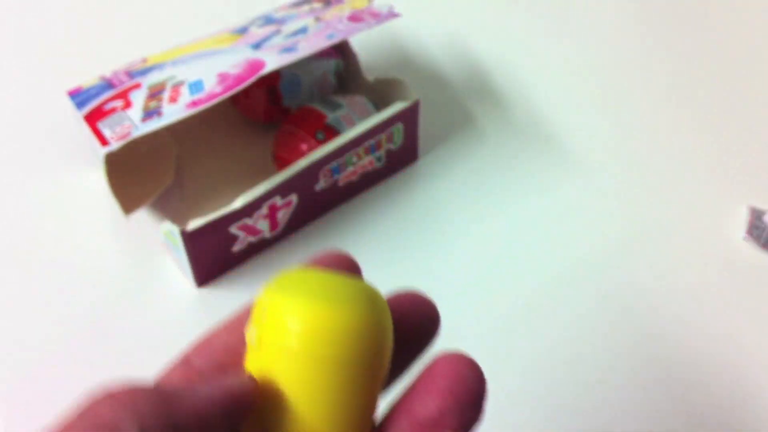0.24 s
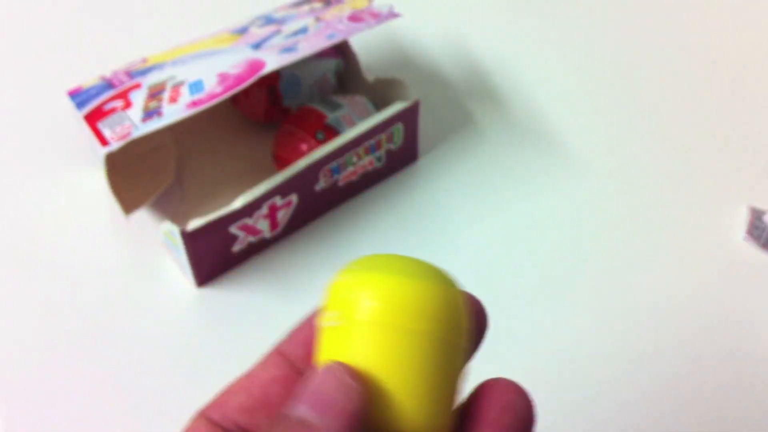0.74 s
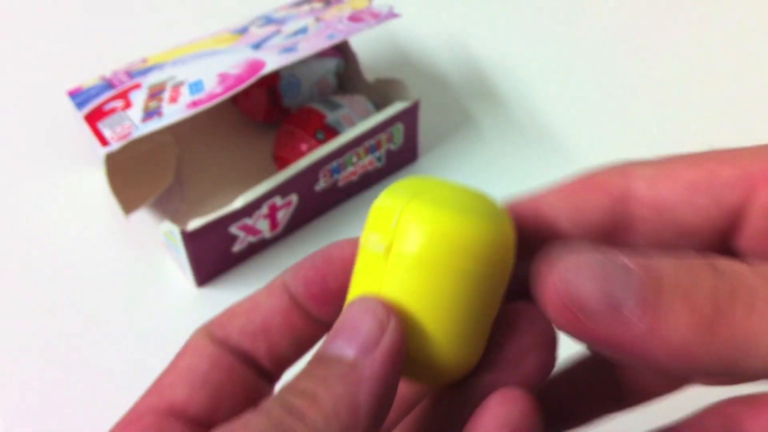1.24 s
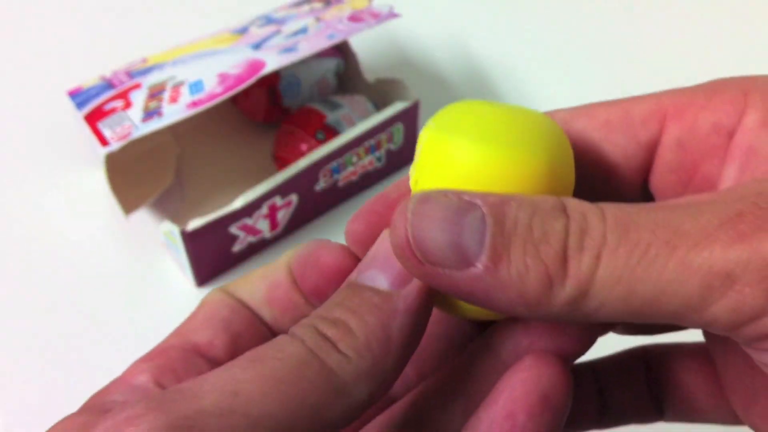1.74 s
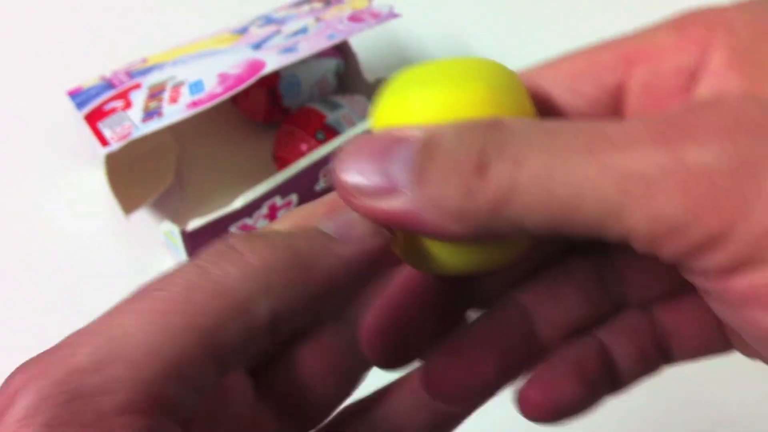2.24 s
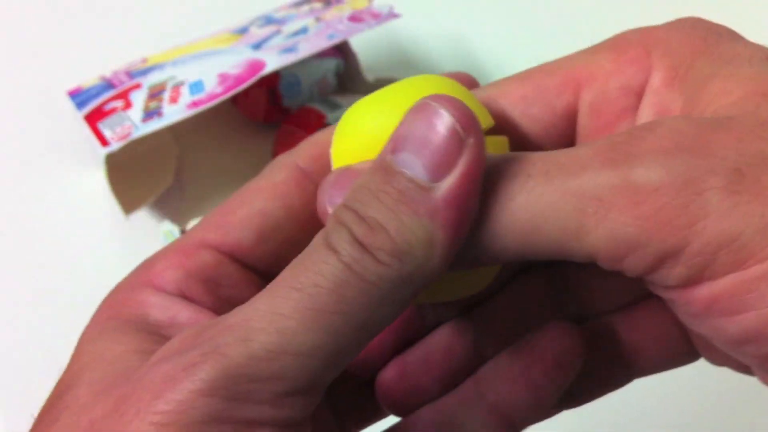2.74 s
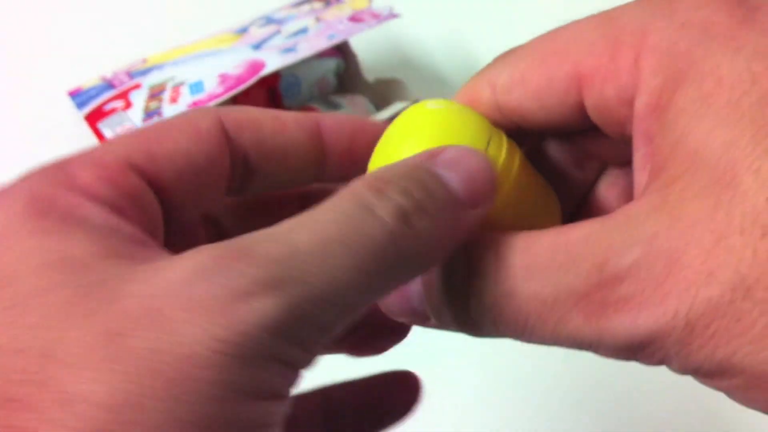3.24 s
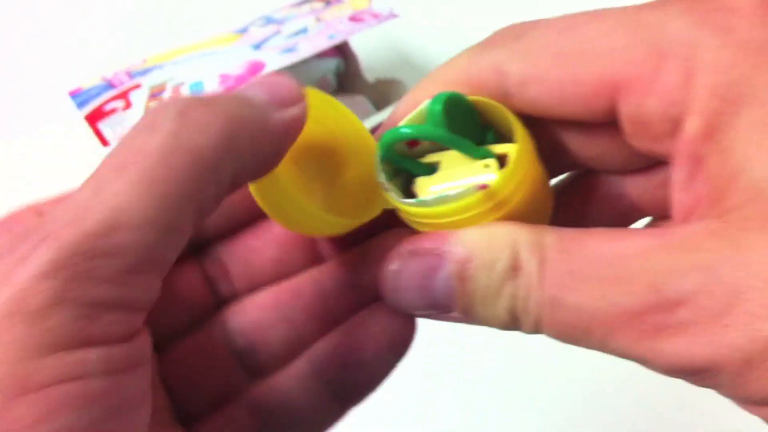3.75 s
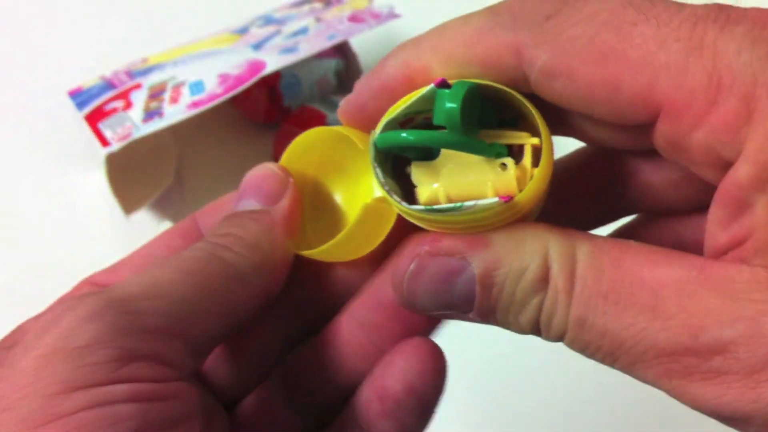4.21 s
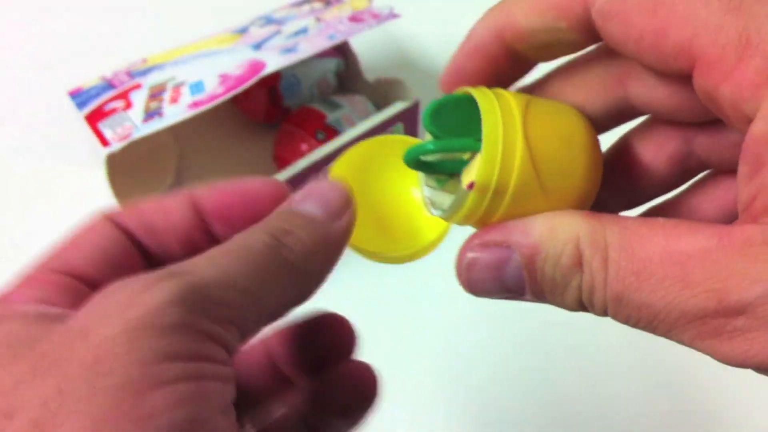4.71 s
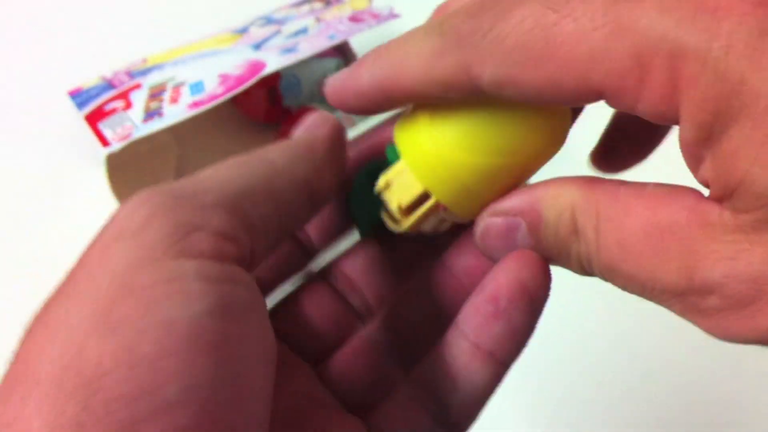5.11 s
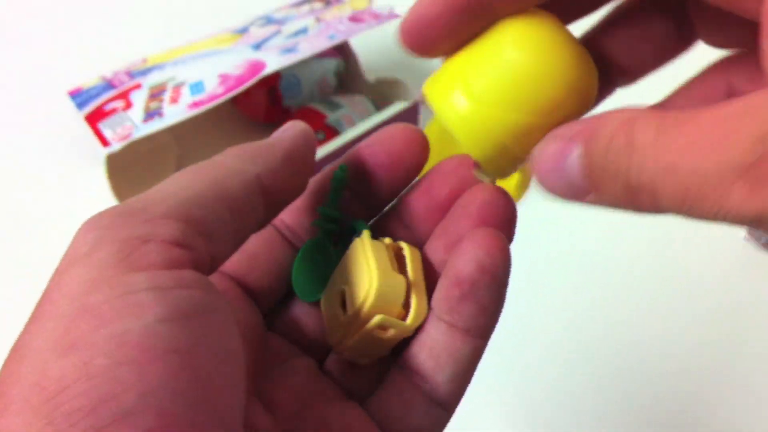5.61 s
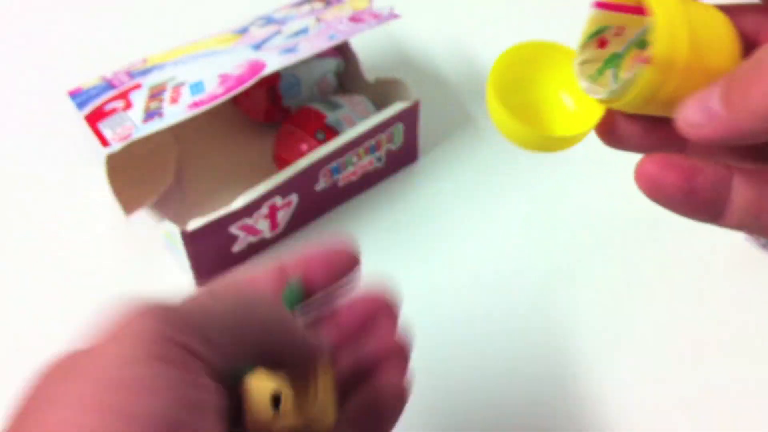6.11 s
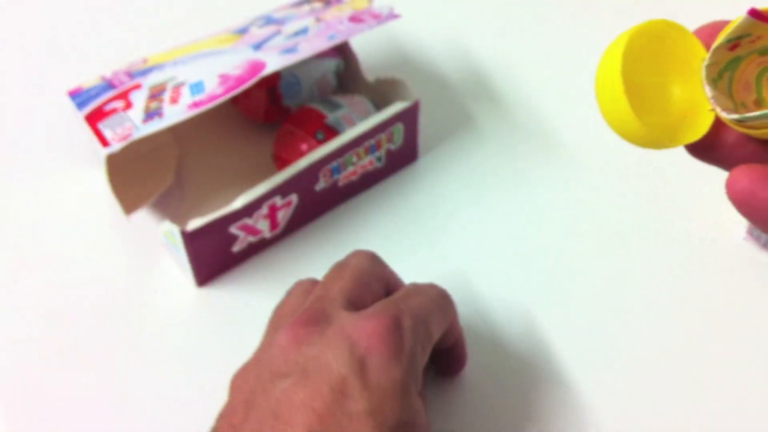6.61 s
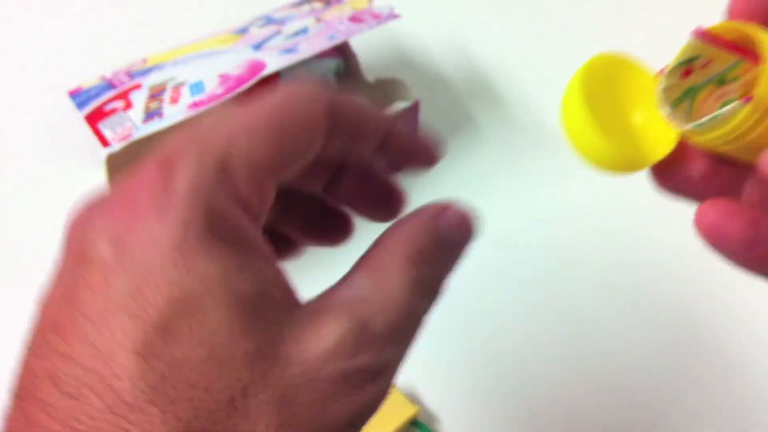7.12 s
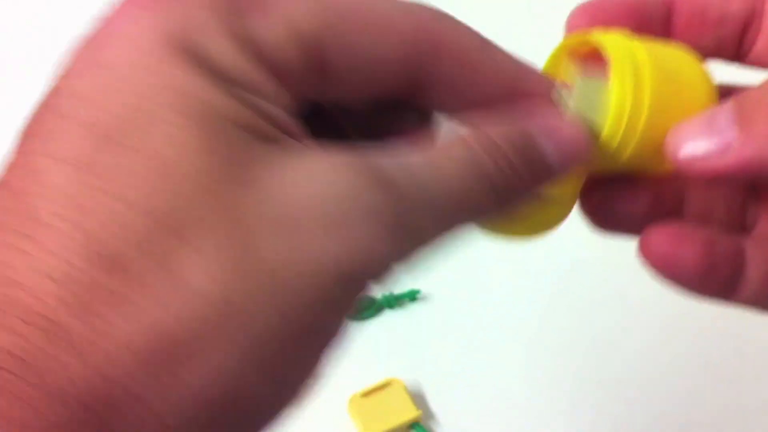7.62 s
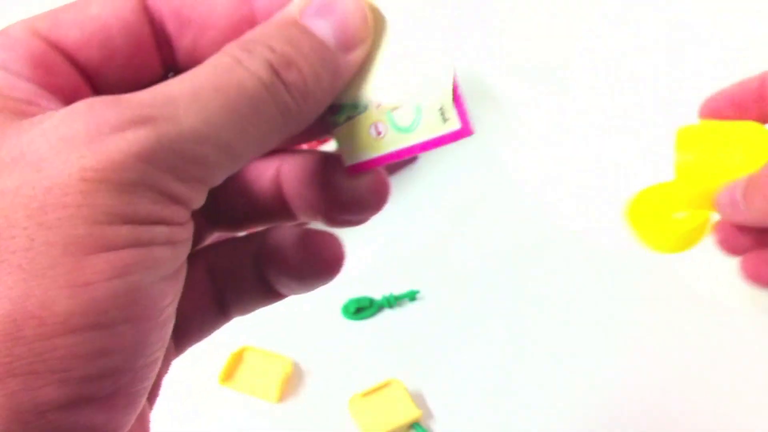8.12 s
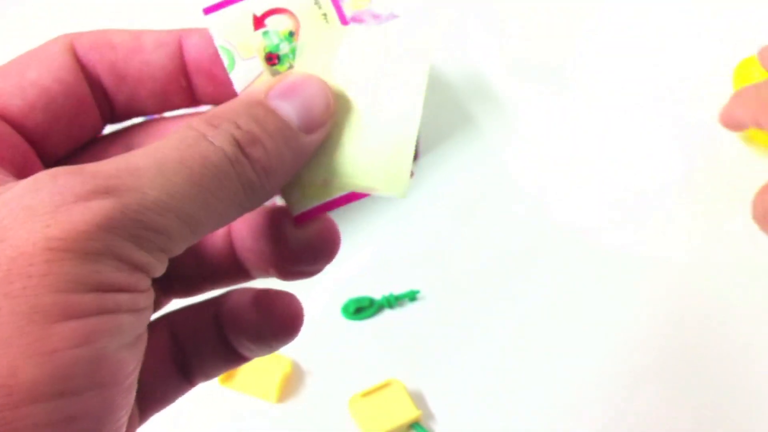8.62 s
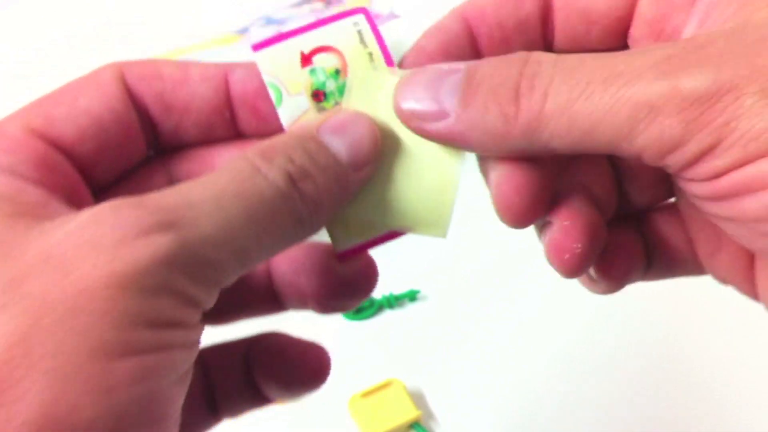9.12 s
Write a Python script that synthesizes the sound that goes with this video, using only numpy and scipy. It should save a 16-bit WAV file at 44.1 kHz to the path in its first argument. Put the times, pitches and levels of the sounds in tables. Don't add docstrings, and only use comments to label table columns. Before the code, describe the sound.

Close indoor handling of a small plastic capsule over low room hum and faint fan noise: a few hollow taps and a dull roll, a pause, then a loud sharp pop. A tiny squeak follows as the lid comes away. Parts tick together in the hand, clatter and bounce on a hard tabletop with a short room tail, then paper cracks crisply and the hollow cup is brushed and tapped.

```python
import sys
import numpy as np
from scipy import signal
from scipy.fft import rfft, irfft
from scipy.io import wavfile
from scipy.ndimage import uniform_filter1d

SR = 44100
rng = np.random.default_rng(int(sys.argv[2]) if len(sys.argv) > 2 else 0)


def invert_db(level):
    return 10 ** (np.asarray(level, dtype=float) / 20)


def file_out(sig):
    cols = np.atleast_2d(sig).T
    lim = np.clip(cols, -1, 1)
    pcm = np.round(lim * 32767).astype(np.int16)
    wavfile.write(sys.argv[1], SR, pcm)


N = 412335


def rms_one(x):
    return x / np.sqrt(np.mean(x ** 2) + 1e-20)


def peak_one(x):
    return x / np.max(np.abs(x))


def bandpass(x, order, low_hz, high_hz):
    return signal.sosfilt(signal.butter(order, [low_hz, high_hz], "band", fs=SR, output="sos"), x)


def at_hz(points, hz):
    table_hz, value = np.transpose(points)
    return np.interp(np.log(hz + 1), np.log(table_hz), value)


def coloured(x, spectrum):
    gain = invert_db(at_hz(spectrum, np.fft.rfftfreq(len(x), 1 / SR)))
    return irfft(rfft(x) * gain, len(x))


def resonate(x, hz, width_hz):
    r = np.exp(-np.pi * abs(width_hz) / SR)
    poles = [1, -2 * r * np.cos(2 * np.pi * hz / SR), r * r]
    return signal.lfilter([(1 - r * r) / 2, 0, (r * r - 1) / 2], poles, x)


def body(x, modes, spread_db=0):
    luck = spread_db * rng.standard_normal(len(modes))
    out = 0
    for k, (hz, width_hz, db) in enumerate(modes):
        out = out + (-1) ** k * invert_db(db + luck[k]) * resonate(x, hz, width_hz)
    return out


def wander():
    turns_per_s = 18
    knots = np.arange(0, N / SR + 1, 1 / turns_per_s)
    return np.interp(np.arange(N) / SR, knots, rng.standard_normal(len(knots)))


def turning(x, modes):
    swing_db = 3
    return rms_one(sum(body(x * invert_db(swing_db * wander()), [mode]) for mode in modes))


def grains(per_s, size_db):
    sizes = invert_db(size_db * np.minimum(rng.exponential(1, N), 5)) * rng.choice([-1, 1], N)
    return sizes * (rng.random(N) < per_s / SR) + 1e-18


def swells(rows, column, shape):
    attack, release, fade_db, sag_db = shape
    out = np.zeros(N)
    for row in rows:
        start, end = row[0], row[0] + abs(row[1]) + 1e-3
        span = np.arange(int((start - attack) * SR), int((end + release) * SR))
        low_db = sag_db * (end - start)
        corners_s = [start - attack, start, end, end + release]
        loss_db = np.interp(span / SR, corners_s, [fade_db, 0, low_db, low_db + fade_db])
        out[span] += invert_db(row[column] - loss_db)
    return out


def contacts(table, modes, thud_hz, sizzle_hz, body_db, cycles, thud_db, thud_low_hz=420):
    first_slip = 0.9
    thud_best_hz, thud_loss_db_per_octave = 910, 6.5
    out, t = np.zeros(N + 4096), np.arange(4096) / SR
    for s, peak_db, hz, length_ms, sizzle_db in table:
        age = 1000 * t / max(length_ms, .2)
        slips = invert_db(2.5 * uniform_filter1d(rng.standard_normal(len(t)), size=24) * np.sqrt(24))
        envelope = slips * np.exp(-3 * age) * np.minimum(20 * age, 1)
        scuff, grit = rng.standard_normal((2, len(t))) * envelope + 1e-18
        scuff[8] += first_slip * np.sqrt(np.sum(scuff ** 2))
        thud = peak_one(bandpass(scuff, 2, thud_low_hz, thud_hz))
        sizzle = peak_one(bandpass(grit, 1, sizzle_hz, 11000))
        sound = peak_one(resonate(scuff, hz, hz / cycles))
        sound += invert_db(body_db) * peak_one(body(grit, modes, spread_db=2.5))
        sound += invert_db(thud_db - thud_loss_db_per_octave * abs(np.log2(hz / thud_best_hz))) * thud
        sound += invert_db(sizzle_db) * sizzle
        start = round(s * SR)
        out[start:start + len(t)] += invert_db(peak_db) * peak_one(sound)
    return out[:N]


# pitch_hz, density_db (per Hz)
AIR_SPECTRUM = [(20, -26), (50, -28.5), (75, -29), (110, -23), (150, -10), (190, -10), (240, -8),
                (320, -9.5), (420, -11), (574, -17), (1190, -27), (3840, -31), (9000, -34.5),
                (16000, -37.5)]
# pitch_hz, level_db (rms)
MAINS_LINES = [(50, -85.5), (100, -70.5)]
# pitch_hz, width_hz, level_db (rms)
FAN_TONES = [(147.2, 8, -71.5), (161.6, 6.7, -65), (301, 14, -71.5), (323.7, 27, -64)]


def background():
    t = np.arange(N) / SR
    out = invert_db(-61) * rms_one(coloured(rng.standard_normal(N), AIR_SPECTRUM))
    for hz, db in MAINS_LINES:
        out += invert_db(db) * np.sqrt(2) * np.sin(2 * np.pi * hz * t)
    for hz, width_hz, db in FAN_TONES:
        once = resonate(rng.standard_normal(N), hz, width_hz)
        out += invert_db(db) * rms_one(resonate(once, hz, width_hz))
    return out


# pitch_hz, decay_s
ROOM_DECAY = [(150, 0.97), (800, 0.47), (3000, 0.44), (12000, 0.36)]


def room(x):
    gap_s, early_db, early_s = .005, 4, 0.0016
    t, tail = np.arange(SR // 2) / SR, 0
    for low in 110 * 2. ** np.arange(7):
        band = bandpass(rng.standard_normal(len(t)), 2, low, min(2.3 * low, 17000))
        tail = tail + band * invert_db(-60 * t / at_hz(ROOM_DECAY, 1.5 * low))
    tail *= np.clip(t / gap_s - .5, 0, 1) * (1 + invert_db(early_db) * np.exp(-t / early_s))
    return invert_db(-12) * signal.fftconvolve(x, tail / np.sqrt(np.sum(tail ** 2)))[:N]


# start_s, level_db (peak)
TABLE_KNOCKS = [
    (2.709, -70),
    (6.8, -68),
    (7.11, -67),
]


def jolts():
    hz, width_hz = 38, 14
    clicks = np.full(N, 1e-18)
    for s, db in TABLE_KNOCKS:
        clicks[round(s * SR)] = invert_db(db)
    wobble = resonate(resonate(clicks, hz, width_hz), hz, width_hz)
    return peak_one(wobble) * np.max(clicks)


# pitch_hz, density_db (per Hz)
RUB_HISS = [(2500, -6.5), (4000, -2.5), (6000, 0.5), (9000, 0.5), (12000, -3.5), (16000, -1.5)]
# pitch_hz, width_hz, level_db
CUP_MODES = [(1400, 900, 1), (1700, 180, 3.5), (855, 370, -11), (3000, 280, -1.5), (5600, 300, -15.5)]
# start_s (full pressure), held_s, ring_db, hiss_db
RUBS = [(.05, 0.046, -70, -72), (.8, 0.056, -70, -76), (.92, 0.067, -70, -72), (5.13, 0.027, -65, -70),
        (5.55, 0.034, -68, -72), (1.44, 0.0088, -75, -59.5), (1.56, 0.0092, -71, -68), (1.7, .01, -73, -65),
        (2.08, 0.0033, -88, -61), (3.99, 0.0091, -72.5, -65), (4.6, 0.044, -72, -76),
        (5.07, 0.045, -62.5, -61), (5.19, .01, -61, -61.5), (5.36, 0.078, -64, -77), (5.5, 0.013, -71, -60),
        (5.84, 0.0084, -82, -72), (6.0, 0.0092, -67, -65), (6.25, .01, -82, -74), (6.43, 0.021, -84, -60),
        (6.5, 0.056, -70, -58), (7.45, 0.009, -67, -61), (7.71, 0.023, -58.5, -54),
        (7.77, 0.039, -57, -55.5), (7.97, 0.009, -83, -67), (8.37, 0.007, -85, -65.5),
        (8.485, .01, -83, -67), (8.56, 0.02, -55.5, -57), (8.6, 0.022, -57, -78), (8.64, 0.055, -56, -71),
        (8.72, 0.0098, -74, -65)]
# attack_s, release_s, fade_db (both ends), sag_db_per_s (while held)
RUB_SHAPE = (.045, .06, 22, 30)


def slides():
    ring = turning(grains(2000, 2.2), CUP_MODES)
    hiss = rms_one(coloured(grains(5000, 2.6), RUB_HISS))
    return swells(RUBS, 2, RUB_SHAPE) * ring + swells(RUBS, 3, RUB_SHAPE) * hiss


# pitch_hz, width_hz, level_db
LID_MODES = [(1190, 115, 1.5), (1560, 380, -6), (4500, 430, -19), (8300, 700, -16)]
# start_s (release), held_s, ring_db, hiss_db
LID_SQUEAKS = [
    (3.634, .012, -60, -72),
    (3.648, 0.0037, -51, -60),
    (3.655, .003, -69, -53.5),
]
# attack_s, release_s, fade_db (both ends), sag_db_per_s (while held)
SQUEAK_SHAPE = (0.011, 0.0046, 23, 30)


def peel():
    grit = grains(6000, 2.0)
    ring = rms_one(body(grit, LID_MODES))
    hiss = rms_one(coloured(grit, RUB_HISS))
    return swells(LID_SQUEAKS, 2, SQUEAK_SHAPE) * ring + swells(LID_SQUEAKS, 3, SQUEAK_SHAPE) * hiss


# pitch_hz, width_hz, level_db
PART_MODES = [(1600, 290, -9.5), (2100, 90, -3), (3000, 500, -11), (4000, 250, 5), (5500, 240, 9),
              (7940, 200, 2), (11000, 1300, -20)]
# start_s, level_db (peak), pitch_hz, length_ms, sizzle_db
PAPER_SNAPS = [
    (8.017, -41, 9000, 43, 7),
    (8.0245, -28.5, 8240, 5, -8),
    (8.0332, -27, 9400, 9.8, -2.5),
    (8.0507, -24, 7600, 1.1, 18),
    (8.034, -31.5, 1420, 8.1, -7),
    (8.8682, -48, 5360, 1.7, -5.5),
    (8.8803, -53, 5260, 1.54, 5),
]


def leaflet():
    return contacts(PAPER_SNAPS, PART_MODES, thud_hz=3700, sizzle_hz=3000,
                    body_db=-27, cycles=6.8, thud_db=17.5)


# start_s, level_db (peak), pitch_hz, length_ms, sizzle_db
SLIDING_PARTS = [(4.9926, -56, 5040, 7, -4), (5.0114, -52, 2000, 13.5, -9), (5.058, -43, 2020, 6.3, -2),
                 (5.0629, -43, 4100, 7.8, 2), (5.0746, -41, 4000, 15, -6), (5.0863, -33, 11000, 8.7, 1),
                 (5.0944, -34.5, 2200, 25, -18), (5.1008, -26, 4950, 6.6, -17),
                 (5.1078, -33.5, 4680, 14, -13), (5.1494, -50, 1570, 10, -9), (5.1894, -45, 5500, 6, -13),
                 (5.233, -50, 3150, 5.8, -10), (5.3517, -45, 4670, 11, -8), (5.364, -46.5, 1560, 8.1, -11),
                 (5.3894, -51, 1800, 9, -12), (5.4071, -47.5, 4050, 12, -12), (5.42, -48, 3930, 7.3, -6)]
# start_s, level_db (peak), pitch_hz, length_ms, sizzle_db
HELD_PARTS = [(5.455, -44, 5500, 9.3, -10), (5.4675, -22.5, 5900, 9, -2), (5.471, -29.5, 4700, 5, -6),
              (5.4899, -27, 5600, 12, 8), (5.5064, -31.5, 4940, 8, -4), (5.5164, -35, 4350, 9.5, 7),
              (5.5483, -46, 7500, 6, -10), (5.558, -40, 5600, 10, -12), (5.5887, -47, 2000, 16, -14),
              (5.6865, -36.5, 3920, 13, -3), (5.7294, -48.5, 2000, 20, 5), (5.8336, -49, 2295, 13, -2),
              (6.0881, -56, 3660, 6, -8), (6.2407, -53, 2600, 7, -6), (6.252, -59, 4500, 7, -12),
              (6.288, -57, 7000, 5.5, -15), (6.4153, -35.5, 3740, 30, 4.5), (6.4394, -45, 5440, 6, -4),
              (6.4827, -34, 9100, 9.9, -13), (6.5231, -37, 6120, 16, -1.5), (6.5494, -53, 6280, 7.6, -10)]


def parts_in_hand():
    out = contacts(SLIDING_PARTS, PART_MODES, thud_hz=2600, sizzle_hz=3630,
                   body_db=0, cycles=12, thud_db=5)
    return out + contacts(HELD_PARTS, PART_MODES, thud_hz=2600, sizzle_hz=3850,
                          body_db=-5.5, cycles=8.8, thud_db=-19)


# pitch_hz, width_hz, level_db
TABLE_MODES = [(590, 15, 15), (920, 47, 10), (1380, 360, 4), (2025, 300, 3), (2720, 160, 0),
               (3700, 300, -3.5), (5500, 200, 0), (7200, 750, -30), (7950, 270, 12), (8640, 350, 7.5),
               (11000, 730, 6)]
# start_s (landing), chatter_s, heavy_part_db, light_part_db
RATTLES = [
    (6.8, .12, -47, -56),
    (6.98, 0.19, -51.5, -57),
    (7.145, 0.11, -46, -54),
]
# attack_s, release_s, fade_db (both ends), sag_db_per_s (while chattering)
RATTLE_SHAPE = (.035, .15, 22, 30)


def rattle():
    out = 0
    heavy, light = (2, TABLE_MODES[:6], 700, 5000), (3, TABLE_MODES[6:], 5000, 15000)
    for column, modes, low_hz, high_hz in (heavy, light):
        bounces = grains(2500, 3.0)
        grit = rms_one(bandpass(bounces, 2, low_hz, high_hz))
        out = out + swells(RATTLES, column, RATTLE_SHAPE) * (1.034 * turning(bounces, modes) + 0.26 * grit)
    return out


# start_s, level_db (peak), pitch_hz, length_ms, sizzle_db
TABLE_HITS = [(6.765, -31, 7940, 13, 0), (6.776, -29, 4000, 19, 2), (6.803, -22.5, 3960, 25, -21),
              (6.798, -16, 2060, 10.6, -3), (6.799, -24.5, 1100, 10, -16), (6.799, -19.5, 3000, 12, -4),
              (6.8121, -34, 1960, 8.6, 9), (6.8391, -21.5, 2250, 13, -6), (6.84, -28, 8300, 14, -16),
              (6.8415, -32, 4100, 10, -16), (6.799, -28, 8100, 32, -10), (6.863, -31, 5600, 7.7, -14),
              (6.8972, -28, 5600, 14, -10.5), (6.8968, -27, 2180, 15, -14.5), (6.862, -32, 3300, 12, -16),
              (6.92, -45, 2200, 17, -10), (6.9668, -29.5, 7940, 9, 5), (6.9754, -29.5, 8650, 12, -13),
              (6.9875, -33.5, 8350, 11, -10.5), (7.015, -40, 8700, 30, -15),
              (7.1076, -14.5, 7570, 4.9, -6.5), (7.114, -28, 8100, 11, -14), (7.109, -26.5, 3700, 7.2, -10),
              (7.126, -37, 7200, 25, -22), (7.206, -33, 7900, 10, -14), (7.2125, -32, 11500, 11, -8),
              (7.139, -31, 2180, 5, -3), (7.1419, -19.5, 11300, 18, -13), (7.1425, -22.5, 3320, 7.4, -7),
              (7.1555, -31, 2780, 4.2, -4), (7.1654, -26, 7950, 7, -19), (7.2028, -26.5, 10900, 16, -7),
              (7.2114, -25.5, 2180, 9.4, 1), (7.238, -29, 2600, 6, -3.5), (7.2487, -32, 9500, 11, -18),
              (7.2788, -33, 11000, 16, -14.5), (7.3, -44, 9000, 15, -12)]


def parts_on_table():
    light_above_hz = 6500
    heavy = [row for row in TABLE_HITS if row[2] < light_above_hz]
    light = [row for row in TABLE_HITS if row[2] >= light_above_hz]
    out = contacts(heavy, TABLE_MODES[:7], thud_hz=2600, sizzle_hz=3000,
                   body_db=-4, cycles=10.3, thud_db=4.5, thud_low_hz=800)
    out += contacts(light, TABLE_MODES[5:], thud_hz=3600, sizzle_hz=3000,
                    body_db=-6, cycles=13, thud_db=5, thud_low_hz=900)
    return out + rattle()


# pitch_hz, width_hz, level_db
SHELL_MODES = [(584, 140, 2), (695.5, 100, -10), (1070, 130, -1), (1250, 64, 6), (1560, 600, -5),
               (2500, 100, -16.5), (3700, 230, -17), (5600, 810, -10)]
# start_s, level_db (peak), pitch_hz, length_ms, sizzle_db
SHELL_KNOCKS = [(.4243, -30.5, 1190, 14, -10), (.4245, -35, 3700, 9.1, -15), (.4248, -39.5, 2750, 11, -20),
                (.539, -38, 1250, 48, -16), (.5405, -43.5, 2590, 21, -7), (.5715, -25.5, 2600, 9, -7),
                (.6, -35, 2600, 30, -5), (.725, -44, 1190, 16, -8), (2.9467, -33.5, 1130, 5.3, -26),
                (2.947, -45, 2656, 4.1, -18), (3.0435, -49, 1046, 6.2, -22), (3.6535, -39, 8300, 9, -6),
                (3.658, -45, 9500, 2.8, -2), (2.97, -60, 5000, 5, 0), (.6157, -32.5, 2500, 12, -3),
                (.65, -42, 2370, 46, -15), (.445, -46, 1350, 170, -10), (4.15, -55, 1520, 7, -12),
                (4.498, -54, 1790, 4.4, 2.5), (4.783, -46.5, 1430, 3.7, 10), (6.0067, -42.5, 1820, 15, -24),
                (6.0068, -47.5, 956, 5.3, -19)]
CUP_KNOCKS = [(7.803, -27.5, 1855, 13, 2), (7.775, -46, 2900, 40, -20), (7.814, -43, 3000, 5.9, -8),
              (8.116, -53.5, 1380, 6.5, -3), (8.1374, -45, 1022, 4.5, 11), (8.536, -43, 3840, 16, 9),
              (8.675, -54, 1380, 38, -25), (8.7175, -36.5, 1720, 6.3, -18), (8.729, -40.5, 1730, 44, -29),
              (8.757, -47, 1800, 8.6, 3), (9.223, -50.5, 1310, 6.6, 11)]
SHELL_TUMBLES = [
    (.5775, -23, 760, 47, -25),
    (.581, -24, 1185, 43, -25),
    (.597, -30.5, 550, 11, 9.5),
    (.616, -39, 1000, 37, 8),
    (.632, -34.5, 734, 110, -21),
    (8.72, -40.5, 630, 40, -25),
]
PALM_BLOWS = [
    (.578, -35, 159, 15, -40),
    (6.8, -38, 242, 36, -40),
    (2.709, -24.5, 160, 14, -43),
    (2.71, -22.5, 275, 9.1, -39),
]
POP_BURST = [
    (2.706, -33, 1200, 4, -1.5),
    (2.7087, -7.5, 1570, 3, -23.5),
    (2.709, -12, 2430, 4, -29),
    (2.7093, -14, 1449, 5.5, -25),
    (2.7095, -12.5, 5600, 4, -9.5),
    (2.7118, -13.5, 5400, 4, -11),
    (2.7115, -8.5, 850, 6.3, -24),
    (2.7125, -15.5, 580, 8, -24.5),
]


def shell():
    out = contacts(SHELL_KNOCKS, SHELL_MODES, thud_hz=900, sizzle_hz=2180,
                   body_db=-9, cycles=9.6, thud_db=-9.5)
    out += contacts(CUP_KNOCKS, SHELL_MODES, thud_hz=890, sizzle_hz=2180,
                    body_db=-15, cycles=17, thud_db=-19)
    out += contacts(SHELL_TUMBLES, SHELL_MODES, thud_hz=1000, sizzle_hz=2300,
                    body_db=2.5, cycles=8.4, thud_db=9.5)
    out += contacts(PALM_BLOWS, SHELL_MODES, thud_hz=700, sizzle_hz=2300,
                    body_db=-26.5, cycles=3.4, thud_db=-12)
    return out + contacts(POP_BURST, SHELL_MODES, thud_hz=899, sizzle_hz=2000,
                          body_db=-13.5, cycles=5.5, thud_db=-9)


# pitch_hz, level_db
WALL_COLOUR = [(300, -0.5), (600, -2.5), (1500, -0.5), (2600, 2.5), (3300, -1), (6000, 0.5), (9000, 4),
               (15000, 9)]


def scene():
    capsule = shell()
    hands = parts_in_hand() + leaflet() + slides() + peel()
    table = parts_on_table()
    near = capsule + hands + table
    near += room(invert_db(-5) * capsule + invert_db(-1) * hands + invert_db(6) * table)
    near += invert_db(-5) * coloured(room(shell()) + room(shell()), WALL_COLOUR)
    near = signal.sosfilt(signal.butter(4, 115, "high", fs=SR, output="sos"), near)
    return (near + background() + jolts())[None]


def top_cut(x):
    return signal.sosfilt(signal.butter(12, 15990, fs=SR, output="sos"), x)


# fade_start_s, silent_s, return_s, full_s
MUTE_S = (2.6958, 2.6972, 2.7042, 2.7052)


def record(dry):
    duck_above_db, duck_most_db, recover_db_per_s = -10, 4, 1.6
    t = np.arange(N) / SR
    over = np.clip(20 * np.log10(np.abs(dry[0]) + 1e-9) - duck_above_db, 0, duck_most_db)
    climb = recover_db_per_s * t
    duck = np.maximum.accumulate(over + climb) - climb
    duck = signal.lfilter([1 / 600], [1, 1 / 600 - 1], duck)
    levelled = dry * invert_db(-duck) * np.interp(t, MUTE_S, [1, 0, 0, 1])
    heard = signal.sosfilt(signal.cheby2(14, 60, 16300, fs=SR, output="sos"), levelled)
    return top_cut(heard)


dry = scene()
out = record(dry)
file_out(out)
```